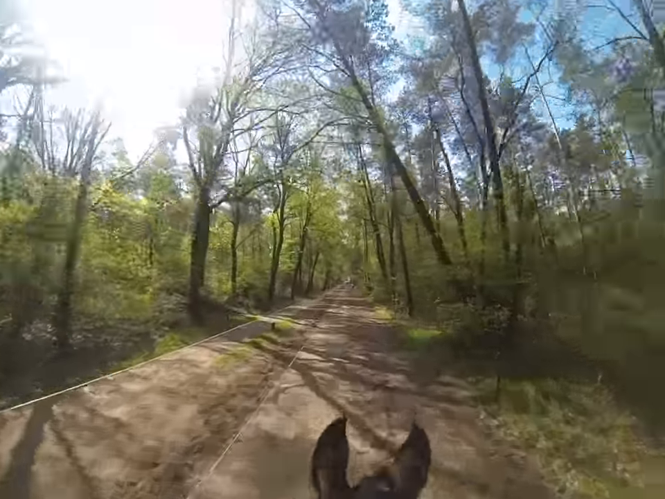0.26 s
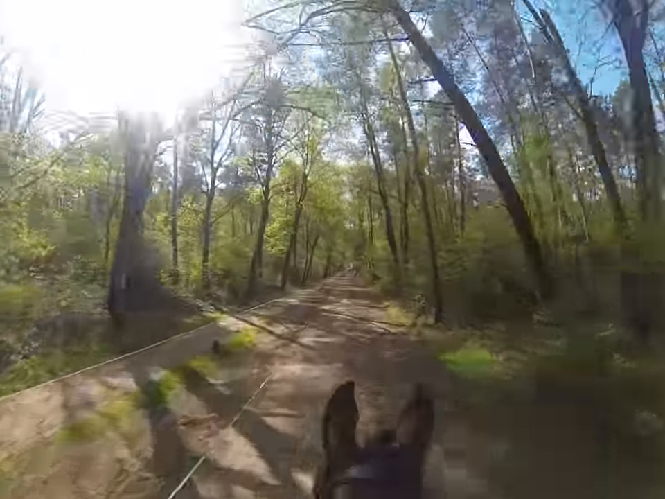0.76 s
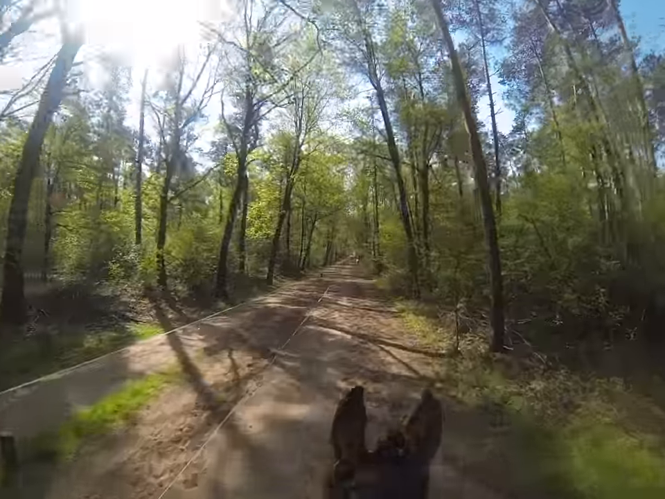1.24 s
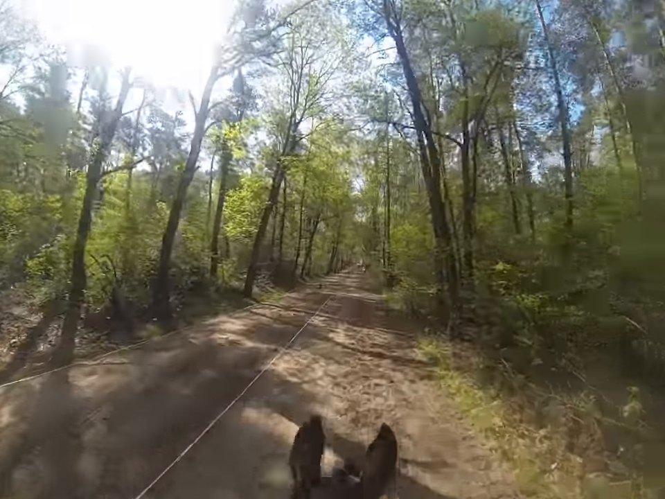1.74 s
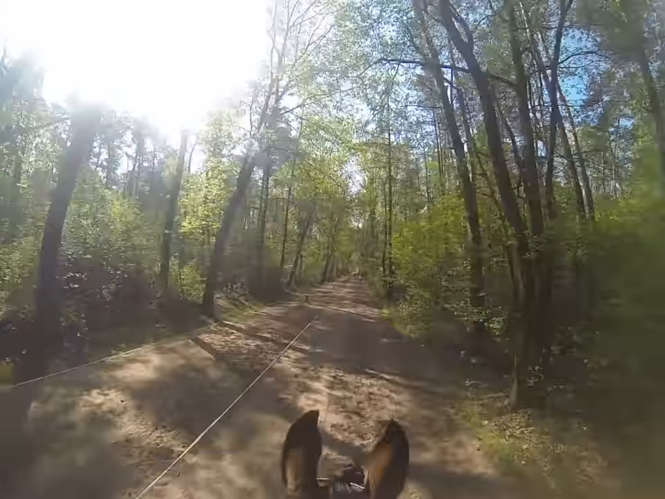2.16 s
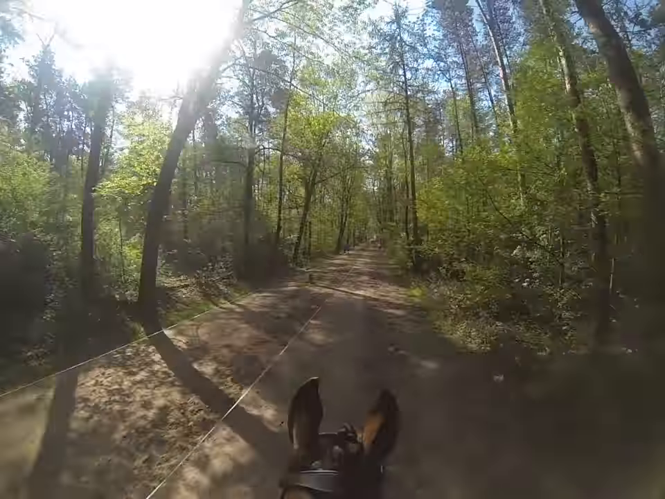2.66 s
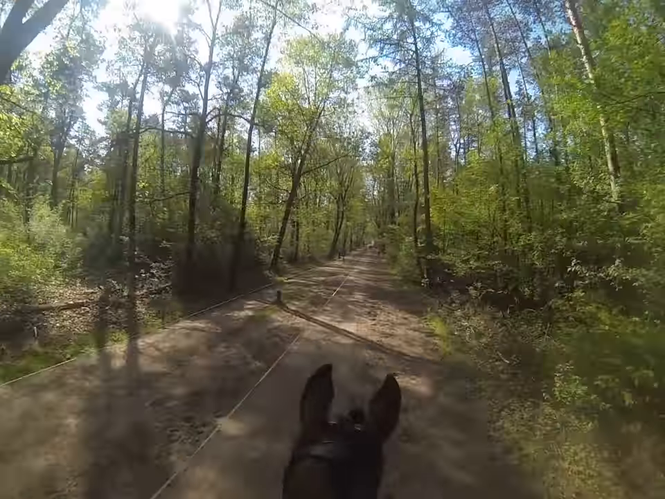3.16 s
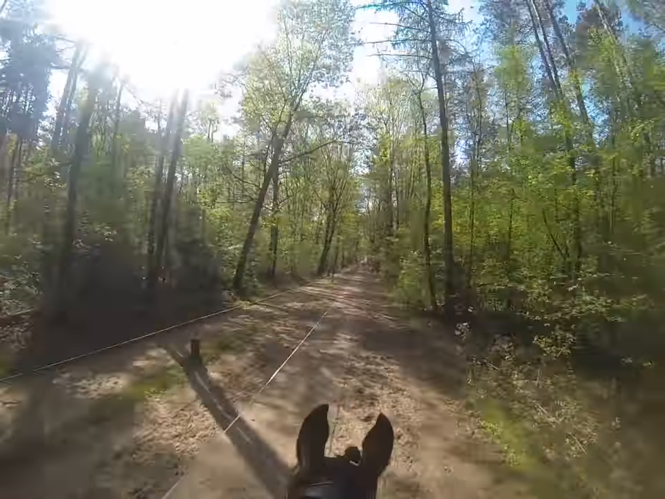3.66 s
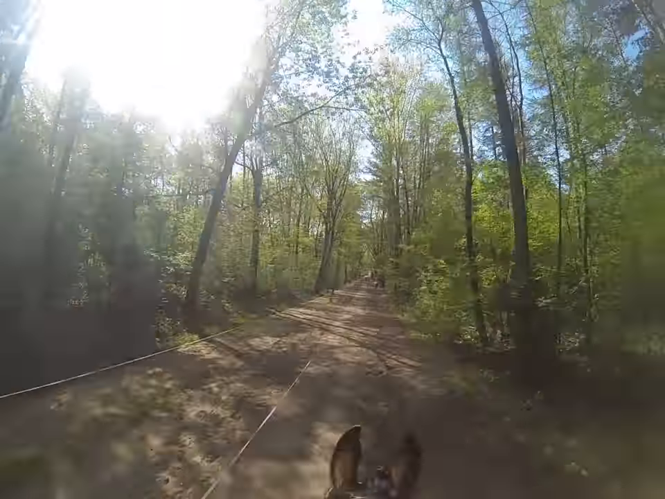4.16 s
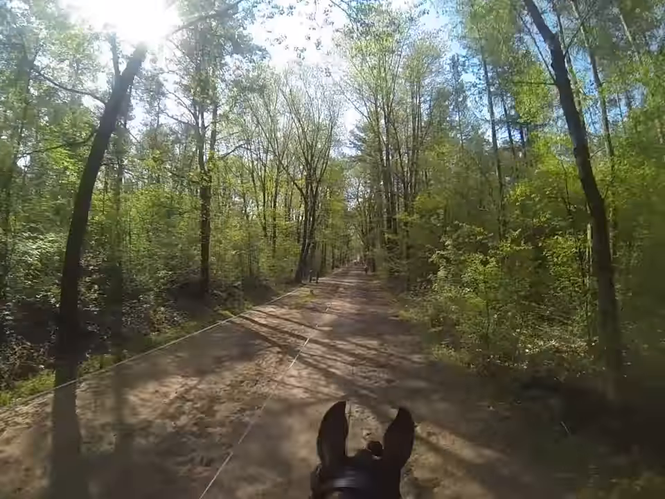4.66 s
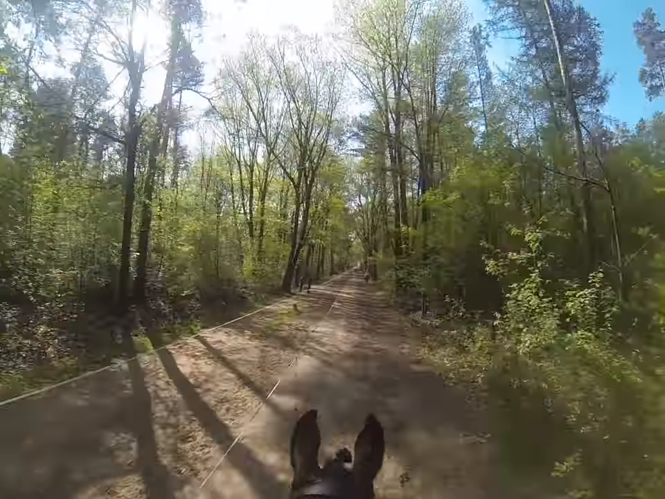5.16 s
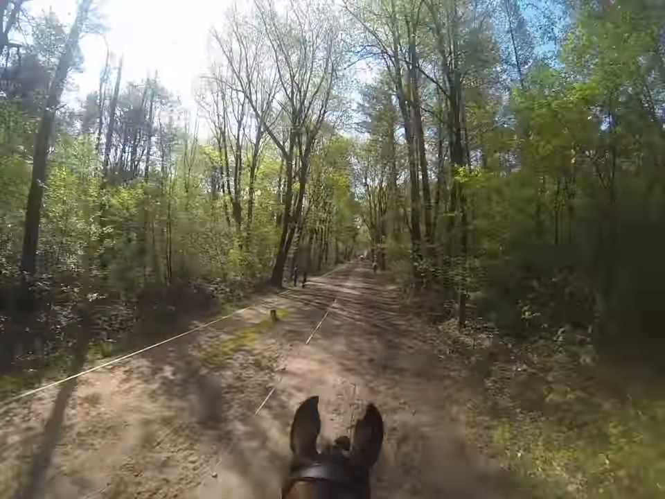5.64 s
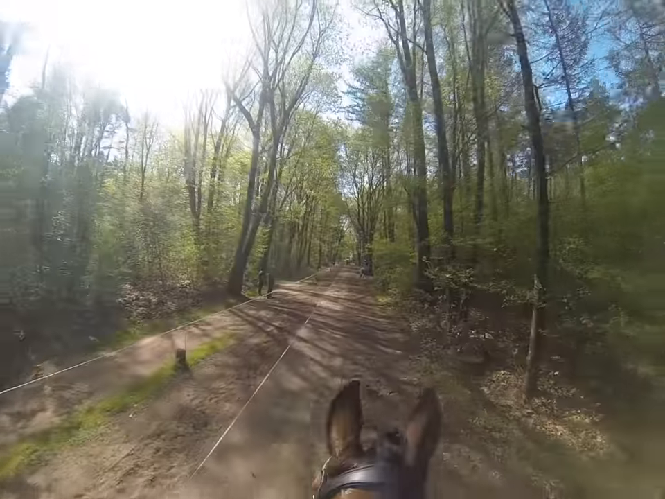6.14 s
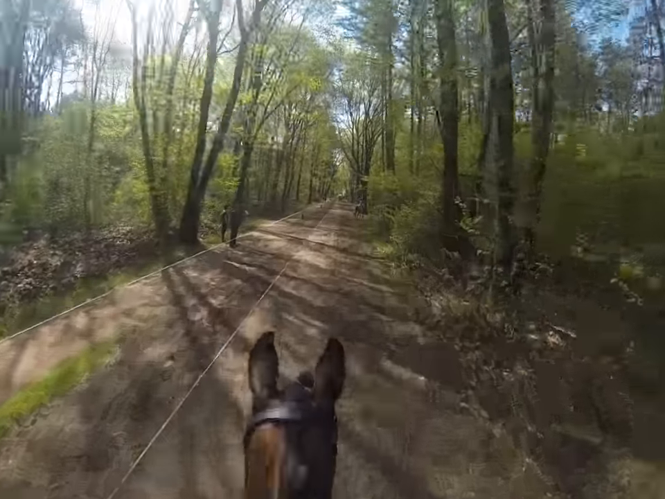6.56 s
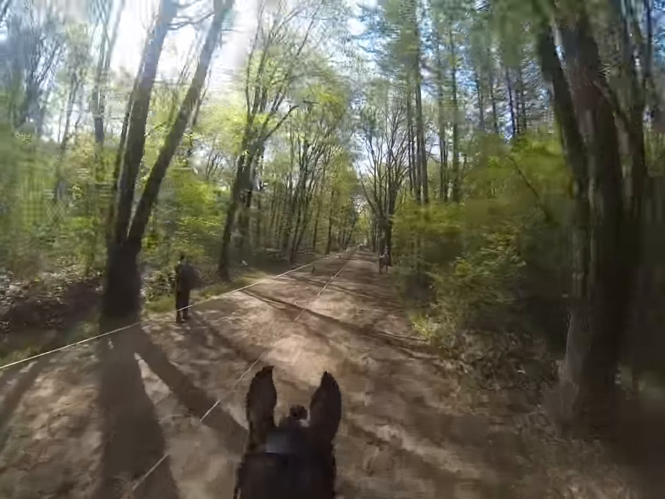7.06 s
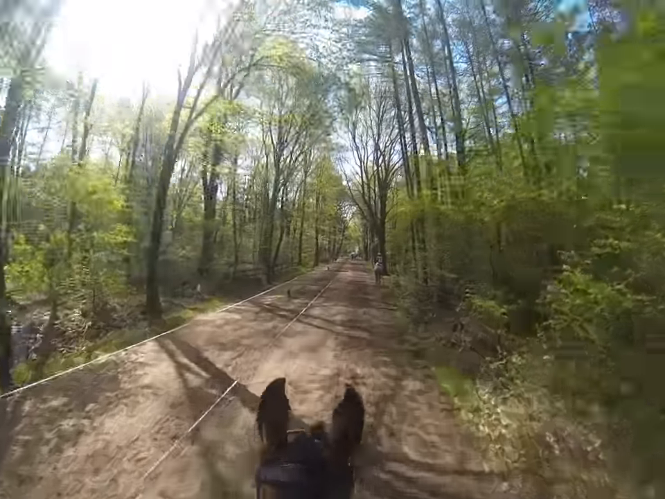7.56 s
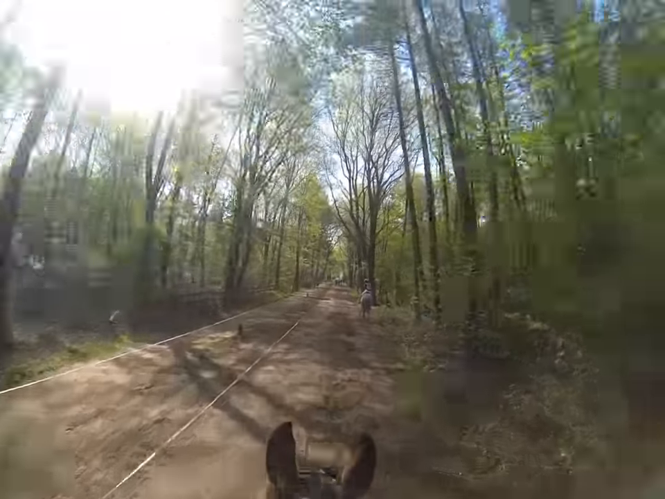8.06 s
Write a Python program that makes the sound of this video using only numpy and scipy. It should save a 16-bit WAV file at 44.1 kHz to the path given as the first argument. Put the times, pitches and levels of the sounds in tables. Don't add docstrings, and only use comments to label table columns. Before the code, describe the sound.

Wind roars and buffets around a small enclosed helmet camera while a cantering horse's hooves land as deep, dull thuds on a sandy forest track.

```python
import sys
import numpy as np
from scipy import signal
from scipy.fft import rfft, irfft, next_fast_len
from scipy.io import wavfile
from scipy.ndimage import uniform_filter1d

SR = 44100
rng = np.random.default_rng(int(sys.argv[2]) if len(sys.argv) > 2 else 0)


def voltage_ratio(decibels):
    exponent = np.asarray(decibels, float) / 20
    return 10 ** exponent


def digitize_waveform(pressure):
    field = np.atleast_2d(pressure).T
    bounded = np.clip(field, -1, 1)
    quanta = np.round(bounded * 32767).astype(np.int16)
    wavfile.write(sys.argv[1], SR, quanta)


N = 366027


def unit(x):
    return x / np.sqrt(np.mean(x ** 2))


def walk(rate):
    k = int(SR / rate)
    held = np.repeat(rng.standard_normal(N // k + 1), k)
    slewed = uniform_filter1d(uniform_filter1d(held, k), k)
    return unit(slewed[:N])


def lag(x, s):
    k = np.exp(-1 / (max(s, 0.001) * SR))
    return signal.lfilter([1 - k], [1, -k], x)


def add(out, s, sound):
    i = int(s * SR)
    out[i:i + len(sound)] += sound[:N - i]


def filtered(x, order, hz, kind="low"):
    return signal.sosfilt(signal.butter(order, hz, kind, fs=SR, output="sos"), x)


def ring(t, modes):
    y = np.zeros(len(t))
    for hz, db, t60 in modes:
        y += voltage_ratio(db) * np.sin(2 * np.pi * hz * t) * 1000 ** (-t / max(t60, 0.002))
    return y / np.abs(y).max()


def whine():
    frame_hz, line_hz = 47.9555, 12899.1
    read_start, read_share = 0.865, 0.385
    t = np.arange(N) / SR
    frame = t * frame_hz + 1 - read_start
    index = frame.astype(int)
    reading = uniform_filter1d(1.0 * (frame % 1 < read_share), size=24)
    chance = rng.standard_normal((int(frame[-1]) + 1, 2))
    slip = np.cumsum(1.2 * chance[:, 0])[index]
    sign = np.sign(chance[:, 1])[index]
    phase = 2 * np.pi * line_hz * t + slip
    line_tone = voltage_ratio(-59.5) * np.sin(phase)
    half_tone = voltage_ratio(-61.5) * sign * np.sin(phase / 2)
    return reading * voltage_ratio(0.67 * walk(16)) * (line_tone + half_tone)


def wind(roar_db, buffet_db, hiss_db):
    # frequency in Hz, level in dB per Hz.
    air_colour = [(41, -32), (70, 0), (479, -13), (716, -21), (1100, -19), (1310, -11), (3060, -36),
                  (4010, -43), (6550, -51.5), (7000, -52), (11700, -66.5), (13100, -64.5), (14600, -74)]
    # frequency in Hz, width in Hz, lift in dB.
    cavities = [
        (146.5, 53, 7.5),
        (316, 91, 3.5),
        (481, 35, 4),
        (881, 240, 6),
        (1297, 175, 5),
        (1619, 325, 7),
        (3114, 490, 7.5),
        (5050, 590, 8),
    ]
    size = next_fast_len(N)
    hz = np.arange(1, size // 2 + 2) * SR / size
    air_hz, air_db = np.transpose(air_colour)
    colour = voltage_ratio(np.interp(np.log(hz), np.log(air_hz), air_db))
    for f, width, db in cavities:
        colour = colour * voltage_ratio(db / (1 + (2 * (hz - f) / width) ** 2))
    noise = rfft(rng.standard_normal(size)) * colour

    groups = np.zeros((3, N))
    gust, nod = walk(9), walk(15)
    for centre in 70 * 2 ** np.arange(0, 8, 0.5):
        share = np.cos(np.pi / 2 * np.clip(2 * np.log2(hz / centre), -1, 1)) ** 2
        gust = 0.65 * gust + 0.84 * walk(15)
        flicker_db = np.interp(np.log(centre), np.log([100, 1000, 4000, 10000]), [2.87, 0.72, 0.99, 3.3])
        swing_db = flicker_db * (0.44 * gust + 0.71 * walk(25)) + 0.5 * walk(45) + 0.86 * nod
        group = 0 if centre < 600 else 1 if centre < 2100 else 2
        groups[group] += irfft(noise * share, size)[:N] * voltage_ratio(swing_db)
    buffet, roar, hiss = map(unit, groups)
    return voltage_ratio(buffet_db + 1.5) * buffet + voltage_ratio(roar_db + 1.0) * roar + voltage_ratio(hiss_db + 4.0) * hiss


def shake(db):
    hum = signal.sosfilt(signal.butter(2, [22, 52], "band", fs=SR, output="sos"), rng.standard_normal(N))
    return voltage_ratio(db - 2.0 + 2.0 * walk(17)) * unit(hum)


def knocks():
    # start in seconds, rim peak in dB, shell in dB above it,
    # thump in dB above it, contact time in seconds.
    taps = [(0.9653, -31.5, 7, 5, 0.0013), (1.483, -39, -10, 2, 0.0008), (2.5227, -48, 21.5, 8, 0.00077),
            (2.578, -40.5, 8, 2, 0.0009), (2.9066, -47, 14, 4, 0.00062), (3.106, -43.5, 14, 0, 0.0008),
            (4.1976, -36.5, 1, 5, 0.0008), (4.7811, -31.5, 6, -5, 0.00096), (5.3348, -46, 14, -6, 0.0008),
            (5.8681, -36, 6, -3, 0.001), (5.9975, -39.5, 5, 5, 0.00088), (6.4476, -26.5, 11, -11, 0.00088),
            (6.499, -52, -3, -8, 0.001), (6.9582, -42, -4, 11, 0.00096), (7.5097, -27, 4.5, -5, 0.00068),
            (8.0496, -31, 6, -5, 0.0008)]
    rubs = [(0.0648, -30, 7.7, 5, 0.0053), (0.3895, -32.5, 14.5, -7, 0.0022),
            (0.812, -40.5, 14.5, 19, 0.0026), (1.4201, -35, 12, 10.5, 0.0026),
            (1.6784, -34, 9.6, 13, 0.0043), (3.1163, -33.5, 6, 11, 0.003), (3.557, -30.5, 13, 6, 0.005),
            (6.316, -31.5, 9.2, -4, 0.003), (6.4636, -26.5, 2.2, 2, 0.0016), (7.675, -41, 6.8, 18, 0.003),
            (7.9796, -37, 7, 6, 0.006), (8.0654, -42, 0, 3, 0.003)]
    # frequency in Hz, level in dB, t60 in seconds.
    shell_modes = [
        (594, -4, 0.015),
        (890, -4, 0.017),
        (1400, -3.5, 0.02),
        (1706, 5.5, 0.012),
        (2130, -8, 0.0096),
    ]
    rim_modes = [
        (2500, 20, 0.0071),
        (2910, 23.5, 0.0081),
        (4000, 7, 0.012),
        (4140, -4, 0.0076),
        (5150, -11.5, 0.0044),
        (5840, -16, 0.003),
        (7350, -7.5, 0.0022),
    ]
    out, t = np.zeros(N), np.arange(SR // 12) / SR
    hits = list(taps) + list(rubs)
    chance = rng.standard_normal((len(hits), 1024))
    give = 1 - np.exp(-t / 0.0007)
    rim = filtered(give * ring(t, rim_modes), 5, 8000)
    shell = filtered(give * ring(t, shell_modes), 5, 2400)
    grit = rng.standard_normal(len(t)) * give * np.exp(-t / 0.0021)
    rim = rim + voltage_ratio(-11) * filtered(grit, 4, [2220, 5500], "band")
    thump = -np.sin(2 * np.pi * 260 * t) * t / 0.0036 * np.exp(1 - t / 0.0021)
    early = t[:1024]
    for (s, db, shell_db, thump_db, span), c in zip(hits, chance):
        contact = c * early / span * np.exp(-early / span)
        contact = contact * np.sqrt(span / 0.004 / np.sum(contact ** 2))
        contact[12] += 0.0015 / span
        struck = np.convolve(rim + voltage_ratio(shell_db + 2) * shell, contact)[:len(t)]
        add(out, s, voltage_ratio(db + 6.0) * struck + voltage_ratio(db + thump_db + 4.0) * thump)
    return out


def slams():
    # start in seconds, peak in dB, rebound in dB, swing in seconds.
    throws = [
        (6.447, -5, -6, 0.04),
        (7.5101, -8.5, -8, 0.027),
        (8.052, -7, -10, 0.032),
    ]
    out, t = np.zeros(N), np.arange(SR) / SR
    cycles = 36.0 * t + 0.73 * (1 - np.exp(-t / 0.0068))
    bounce = -np.sin(2 * np.pi * 120 * t) * t / 0.0045 * np.exp(1 - t / 0.0045)
    for s, db, rebound_db, swing in throws:
        swell = np.exp(-((t - 0.038) / swing) ** 2) + 0.27 * np.exp(-t / 0.1)
        add(out, s, -voltage_ratio(db + 2.0) * swell * np.sin(2 * np.pi * cycles))
        add(out, s + 0.024, voltage_ratio(db + rebound_db) * bounce)
    return out


def hooves():
    # start in seconds, peak in dB, upper thud in dB, ring in Hz.
    landings = [(0.396, -5, -11.5, 50.4), (0.969, -11, -21, 41.4), (1.408, -17, 0, 40.2),
                (1.988, -13, -20, 41.4), (2.595, -12.5, -19.5, 44.4), (3.089, -7.5, -9, 50),
                (3.7, -12, -5.5, 36.2), (4.163, -22, -29, 37.7), (4.789, -8, -25, 42.6),
                (5.335, -11, -15.5, 46.2), (5.886, -13.5, -27, 38.2), (6.982, -14, -33, 37)]
    # start in seconds, peak in dB, upper thud in dB.
    other_steps = [(0.042, -10, -14), (0.223, -11.5, -13.5), (0.289, -13.5, -7.5), (0.6, -18, -16.5),
                   (0.869, -17, -16.5), (1.18, -16, -9), (1.559, -19.5, -21), (1.655, -12.5, -9),
                   (2.443, -15.5, -20), (2.518, -20, -7), (2.647, -15.5, -9), (2.77, -18, -7),
                   (3.028, -26.5, -10.5), (3.139, -14.5, -20.5), (3.289, -13, -13), (3.559, -15, -9.5),
                   (3.842, -13, -28), (4.643, -14, -2), (4.88, -18, -21), (5.054, -21.5, -10),
                   (5.524, -19.5, -24), (5.598, -20, -13), (5.809, -19, -16.5), (5.967, -19.5, -11),
                   (6.055, -14, -11), (6.278, -15.5, -7), (6.319, -14.5, -25), (7.137, -16, -17.5),
                   (7.679, -13, -27), (7.808, -19, -20)]
    # start in seconds, peak in dB.
    more_steps = [(0.748, -22), (1.496, -16.5), (1.851, -27.5), (2.1, -31), (3.056, -12.5), (3.662, -11),
                  (4.024, -41), (4.317, -22.5), (4.474, -28.5), (5.241, -20), (6.86, -26.5), (7.367, -19)]
    mount_hz, mount_spread, fade_s = 41.8, 0.094, 0.013
    common_thud_db = -14.5
    out, t = np.zeros(N), np.arange(SR // 4) / SR
    rows = list(other_steps) + [(s, db, common_thud_db) for s, db in more_steps]
    chance = rng.standard_normal(len(rows))
    steps = [(*row, mount_hz * (1 + mount_spread * c)) for row, c in zip(rows, chance)]
    swell = (t / (2 * fade_s)) ** 2 * np.exp(2 - t / fade_s)
    thud_cycles = 70 * t + 0.74 * (1 - np.exp(-t / 0.005))
    thud = np.sin(2 * np.pi * thud_cycles) * t / 0.01 * np.exp(1 - t / 0.0074)
    for s, db, upper_db, hz in list(landings) + steps:
        mount_ring = -np.sin(2 * np.pi * hz * t) * swell
        add(out, s - 0.004, voltage_ratio(db - 2.5) * (voltage_ratio(upper_db + 6.0) * thud + mount_ring))
    return out


def scene():
    # time in seconds, level in dB, side wind in dB as the head turns.
    airflow = [(0.0, -34.5, -1), (0.44, -35.5, 0.5), (0.81, -39, -0.5), (1.25, -37.5, 1.5), (1.52, -39, 0),
               (1.9, -37, 0.5), (2.56, -41, 0.5), (2.89, -38.5, 1.5), (3.61, -39.5, 0), (4.11, -36.5, -1.5),
               (4.55, -37.5, 0.5), (6.06, -39.5, -1), (6.26, -40, -0.5), (6.45, -42.5, 1.5),
               (6.66, -43.5, 0), (6.96, -41, 0.5), (7.65, -40.5, -0.5), (8.3, -40.5, -1.5)]
    s, *columns = np.transpose(airflow)
    roar_db, side_db = (np.interp(np.arange(N) / SR, s, c) for c in columns)
    flow = roar_db + 39
    air = wind(roar_db, buffet_db=-36.5 + 0.74 * flow + side_db, hiss_db=-55 + 1.17 * flow)
    beats = hooves()
    jolt_db = 10 * np.log10(lag(unit(beats) ** 2, 0.1) + 0.078)
    return (air + shake(-29 + 0.38 * jolt_db) + beats + slams() + knocks())[None]


def band_limit(x):
    return signal.sosfilt(signal.butter(12, 14800, fs=SR, output="sos"), x)


def record(dry):
    excess = np.clip(np.abs(dry) - 0.43, 0, None)
    over = lag(lag(excess, 0.05), 0.13)
    hiss = voltage_ratio(-74.5 + 1.5 * walk(12)) * rng.standard_normal(N)
    ducked = (dry + hiss) * voltage_ratio(-1.5 * over / over.max())
    rounded = np.tanh(0.59 * ducked) / 0.6
    top_cut = signal.ellip(8, 0.2, 60, 14150, fs=SR, output="sos")
    return band_limit(signal.sosfilt(top_cut, rounded + whine()))


dry = scene()
out = record(dry)
digitize_waveform(out)
```